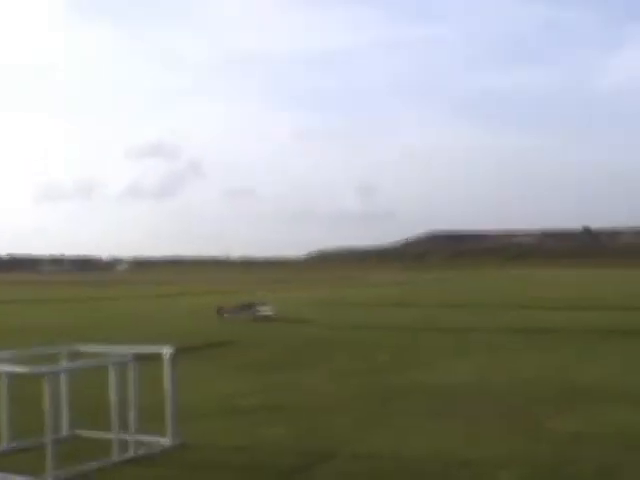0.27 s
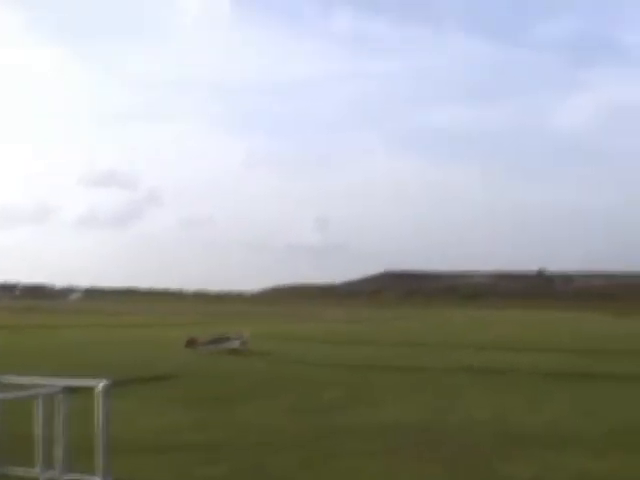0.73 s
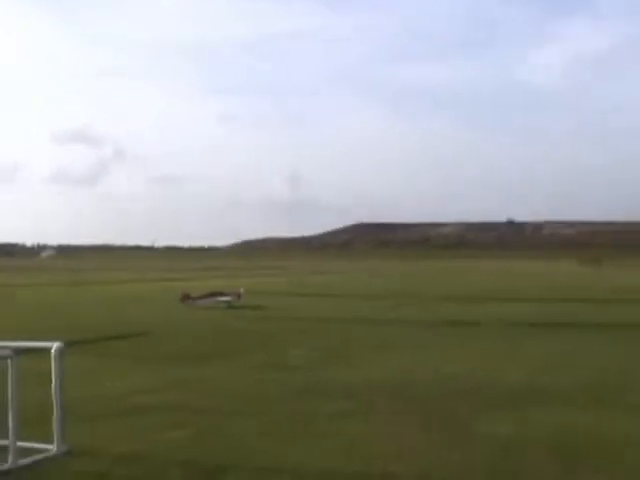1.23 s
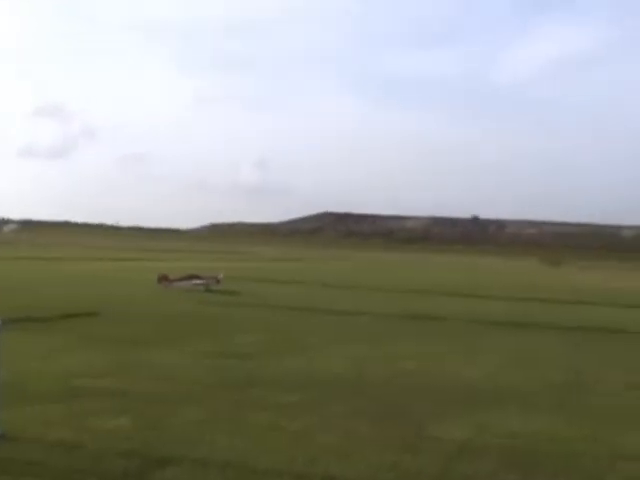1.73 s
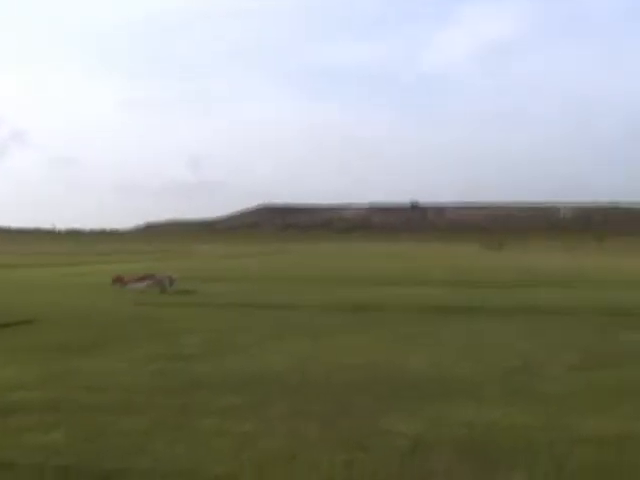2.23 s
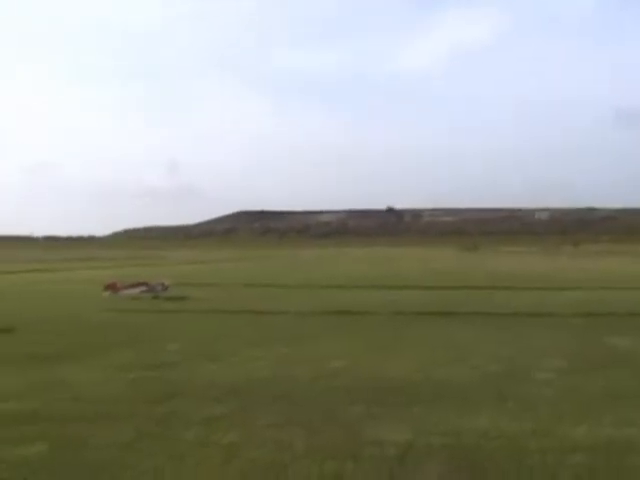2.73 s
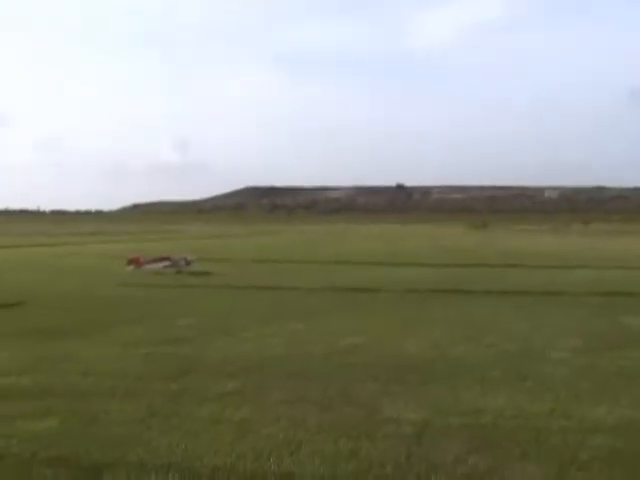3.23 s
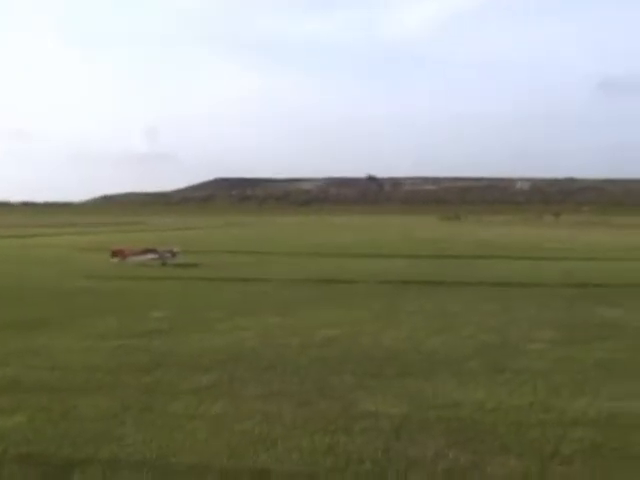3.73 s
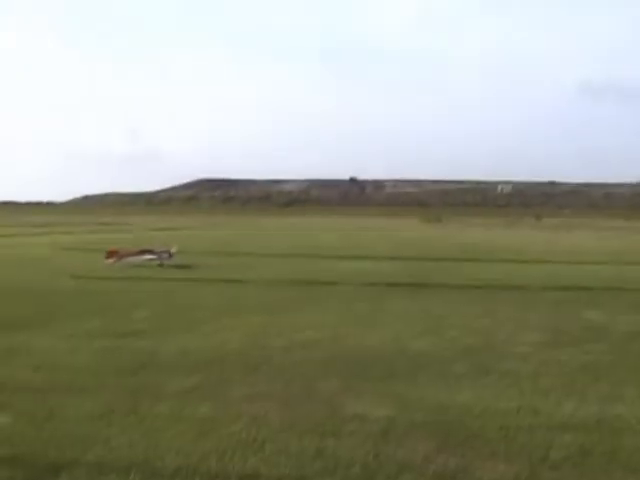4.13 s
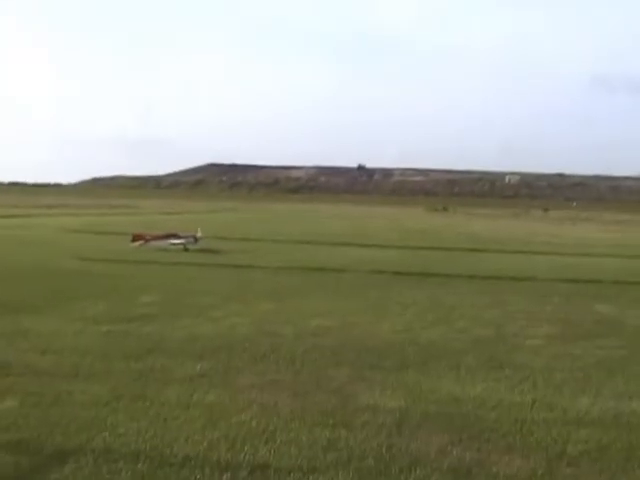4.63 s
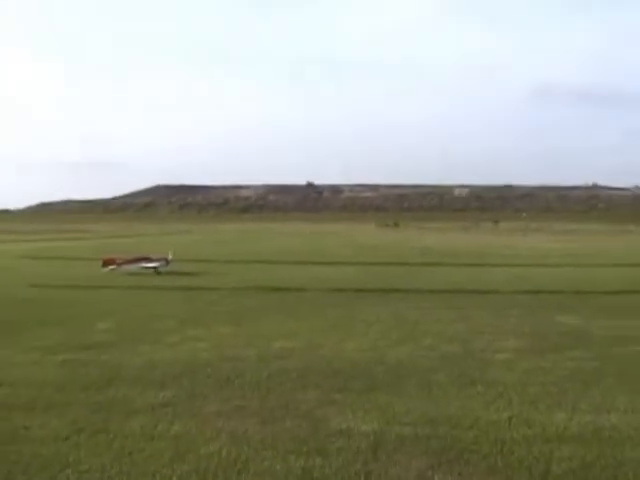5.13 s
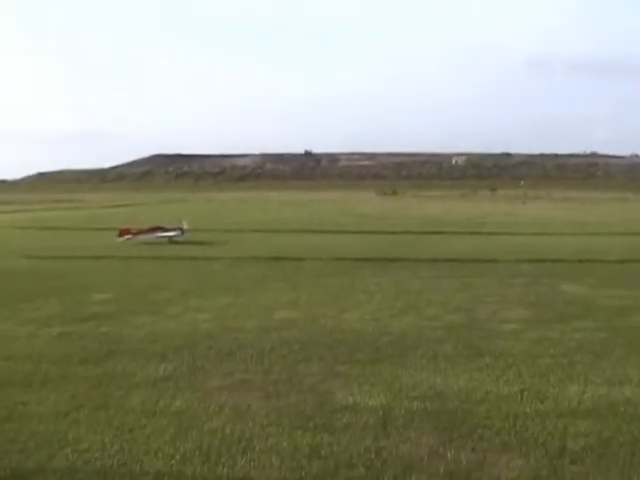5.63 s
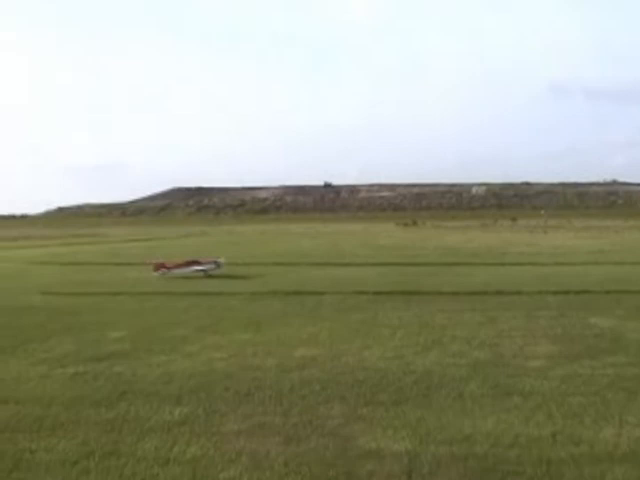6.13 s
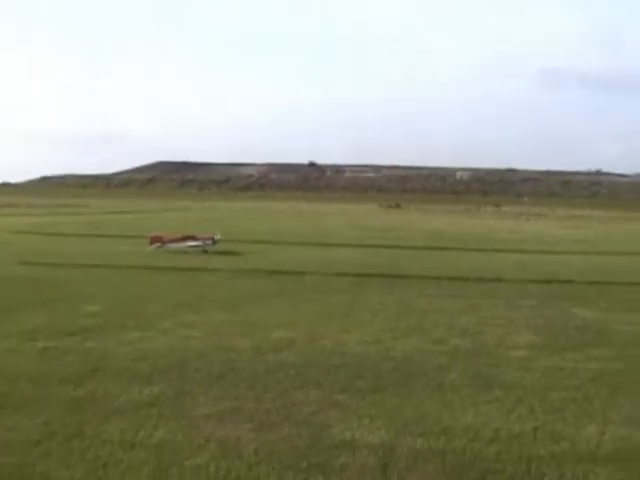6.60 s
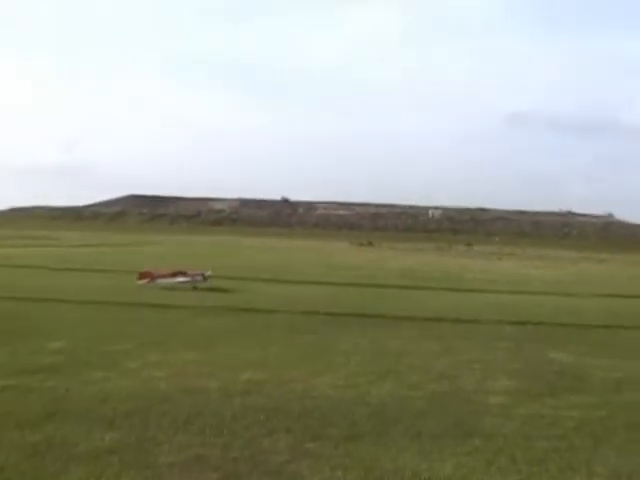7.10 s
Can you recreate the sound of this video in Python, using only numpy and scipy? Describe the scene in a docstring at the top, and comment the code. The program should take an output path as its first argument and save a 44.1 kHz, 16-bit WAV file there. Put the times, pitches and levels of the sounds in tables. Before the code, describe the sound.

A model plane's small two-stroke engine putters unevenly at idle on a grass field, faint then crackling harder, under blustery wind rumbling on the microphone.

```python
"""On a grass field a model plane's two-stroke petrol engine idles, heard through a camera's two ports.
It starts faint in a blustery wind, firing every second or third turn; from about 1 s the cracks grow hard,
peak near 4 s, soften towards 5.5 s, then harden again and fire every second turn at the end.
Each firing is a noise burst with ringing knocks and a falling thump; swelling tones make the unfired puffs,
a sine the propeller hum and coloured noise hiss, clatter and wind. The motor-whine comb hollows it all."""
import sys
import numpy as np
from scipy import signal
from scipy.fft import rfft, irfft
from scipy.io import wavfile
from scipy.ndimage import uniform_filter1d

SR = 44100
rng = np.random.default_rng(int(sys.argv[2]) if len(sys.argv) > 2 else 0)


def generate_wav(sig):
    """Save sig (samples, or channels by samples) to the path in sys.argv[1] as 16-bit PCM at SR."""
    pcm = np.round(np.clip(np.atleast_2d(sig).T, -1, 1) * 32767).astype(np.int16)
    wavfile.write(sys.argv[1], SR, pcm)


N = 324576
TIME = np.arange(N) / SR  # seconds
BINS = np.fft.rfftfreq(N, 1 / SR)  # Hz
FIRST_FIRING_S = 0.0224

# Time tables are joined by straight lines; their levels are relative, ahead of each source's trim.
# Speed of the crank. Each row: time in seconds, speed in turns per second.
CRANK_SPEED = [(0.0, 48.23), (0.15, 45.48), (0.78, 52.77), (1.44, 48.72), (2.13, 50.01), (2.37, 54.38),
               (2.49, 47.76), (2.7, 51.76), (3.12, 48.02), (3.21, 50.61), (3.99, 50.87), (4.05, 48.87),
               (4.41, 51.19), (5.55, 47.41), (5.67, 50.78), (6.63, 52.21), (6.75, 47.09), (7.35, 61.11)]
# Spells when the engine fires every second turn, not every third. Each row: start and end in seconds.
SECOND_TURN_SPELLS = [(0, .17), (1.07, 1.6), (1.66, 1.82), (1.88, 1.96), (2.55, 2.59), (2.89, 2.93),
                      (3.05, 3.09), (3.39, 3.43), (5.22, 5.26), (5.39, 5.47), (6.89, 7.4)]
# How hard the engine burns. Each row: time in seconds, relative strength in dB.
BURN_STRENGTH = [(0, -53), (.4, -49), (.78, -42), (.95, -35), (1.45, -34.5), (1.82, -36), (2.05, -33),
                 (2.7, -37), (2.87, -40.5), (3.02, -36), (3.33, -35.5), (3.8, -28.5), (4.4, -30),
                 (4.7, -35), (5.4, -36.5), (5.7, -35.5), (6.45, -31.5), (6.75, -35), (7.12, -30.5),
                 (7.35, -32)]
# Firings that clang out of the idle, each given to the nearest firing. Each row: time in seconds,
# strength over BURN_STRENGTH in dB, ringing pitch in Hz, extra sizzle in dB.
CLANGING_FIRINGS = [(.022, 4, 6000, 11), (.629, 4, 6300, -3), (.976, 2.5, 5620, -12), (1.211, 4.5, 5470, 0),
                    (1.331, 2.5, 3780, -7), (1.372, 4.5, 5280, -15), (1.413, 4, 5150, 4),
                    (1.617, 4, 5540, -4), (1.982, 2.5, 6600, -4), (2.042, 2.5, 6890, -9),
                    (2.102, 2, 7240, 12), (2.22, 0.5, 5030, 10), (2.337, 2.5, 7350, 15),
                    (2.392, 2, 6450, 28), (2.509, 3, 7200, 12), (2.73, 2.5, 5270, -11),
                    (3.007, 3.5, 5900, 0), (3.292, -2, 3450, 23), (3.687, 0, 5540, 14),
                    (3.805, 0.5, 7200, 3), (3.863, 2.5, 6000, 0), (3.921, 0, 7200, -2),
                    (4.102, -0.5, 5210, -1), (4.283, 1.5, 6900, 1), (4.402, 3, 6920, 0),
                    (5.12, 3.5, 6890, 4), (5.347, 4, 5130, 1), (5.679, 1.5, 5200, 1),
                    (5.857, 2.5, 6070, -2), (5.974, 3, 5030, 3), (6.091, 2.5, 7000, -2),
                    (6.324, 3, 5250, 1), (6.382, 0.5, 5200, -9), (6.498, 3.5, 6010, -12),
                    (7.105, 3, 6010, 1)]
# Charges that barely catch, each the nearest firing. Each entry: time in seconds.
WEAK_CHARGES = [1.251, 3.982, 5.182, 5.243, 5.451]
# Sizzling top of the cracks. Each row: time in seconds, relative level in dB.
CRACK_SIZZLE = [(0, -7), (.7, 4), (1.4, -5), (1.9, 1), (2.35, -13), (2.65, 2), (3.3, -3), (3.9, -2),
                (4.4, -1), (4.7, -2), (5.6, -14), (6.55, 0), (7.35, -10)]
# Colour of the exhaust crack. Each row: frequency in Hz, relative spectrum level in dB.
CRACK_COLOUR = [(150, 6), (400, 13.5), (700, -1.5), (1200, -2.5), (2000, -8.5), (3000, -6), (4500, -0.5),
                (5300, 0.5), (7100, -0.5), (8000, -11), (10500, -15.5), (12500, -17), (15200, -10),
                (16200, -25)]
# Resonances of muffler and cylinder. Each row: frequency in Hz, width in Hz, nominal boost in dB.
METAL_MODES = [(1714, 110, 9), (2310, 530, 9), (3415, 44, 8.5), (3650, 48, 8), (5215, 81, 6.5),
               (7090, 500, 4), (8940, 570, 6)]
# Modes that the combustion knock rings. Each row: nominal frequency in Hz,
# level against the firing in dB, decay in seconds.
KNOCK_MODES = [(1690, -6.5, 0.0044), (2290, -11.5, 0.003), (5190, -8.5, 0.0055)]
# The engine at the two ports. Each row: frequency in Hz, left minus right in dB, likeness from -1 to 1.
ENGINE_AT_PORTS = [(500, 1, -0.23), (1250, 4, 1), (1720, 7.5, 1), (2340, 0.5, 1), (3280, -5, 0.038),
                   (4130, 1, 0.47), (5900, -0.5, 0.88), (6760, 1.5, -0.25), (9130, 11, 0.2),
                   (10600, -2, 0.73), (12700, 8, 0.5), (15100, -0.5, 1)]
# Hiss and rattle between firings. Each row: time in seconds, relative level in dB.
HISS_OVER_TIME = [(0, -58.5), (.55, -58), (1.0, -48.5), (2.4, -48), (2.8, -57), (3.4, -49), (4.2, -45),
                  (4.65, -53.5), (5.7, -49.5), (6.75, -50.5), (7.35, -46)]
# Colour of hiss and clatter. Each row: frequency in Hz, relative spectrum level in dB.
HISS_COLOUR = [(600, 2), (1500, -7.5), (2400, 0.5), (3200, -0.5), (5200, -3), (7000, -2.5), (8200, -12),
               (11000, -18.5), (16200, -51)]
# Sharp ticks close to the microphone. Each row: start in seconds, relative level in dB.
CLOSE_TICKS = [(0.776, -32), (7.2687, -20)]
# Wind buffeting the ports. Each row: time in seconds, relative level in dB.
BUFFET_OVER_TIME = [(0, -27.5), (.3, -32.5), (.38, -38.5), (1.08, -42), (1.38, -30), (1.6, -27),
                    (1.78, -37), (2.14, -35.5), (2.27, -26.5), (2.75, -28), (3.2, -33.5), (3.7, -35),
                    (4.1, -37), (4.36, -35.5), (4.5, -31), (4.9, -29), (5.1, -36), (5.35, -31),
                    (5.66, -51.5), (6.0, -29), (6.22, -39), (6.5, -27.5), (6.85, -34), (7.35, -32)]
# How sharply the wind tears at the ports. Each row: time in seconds, bright flutter's share in dB.
TEARING_OVER_TIME = [(0, -15.5), (.27, -9), (.31, -13), (2.4, -12.5), (3.2, -5), (3.5, -1), (3.9, -7.5),
                     (4.8, -13), (7.35, -11)]
# Slow, deep wind pressure. Each row: time in seconds, relative level in dB.
PRESSURE_OVER_TIME = [(0, -32), (.8, -31), (1.3, -23.5), (2.05, -26.5), (2.3, -25), (3.3, -23), (3.6, -26),
                      (4.0, -20.5), (4.2, -25), (5.0, -26), (5.68, -30.5), (5.95, -21), (6.5, -22),
                      (6.72, -25.5), (7.35, -24.5)]
# Single large eddies that strike the ports. Each row: centre in seconds,
# extra buffeting in dB, extra deep pressure in dB.
LARGE_EDDIES = [(1.181, 3.5, 7.5), (1.44, -3.5, 7), (1.69, 1, 8), (1.907, 12, 4.5), (3.76, -0.5, 7.5),
                (3.89, 1, 5), (4.43, 1, 7.5), (4.547, 6, 6), (4.67, 2.5, -4), (5.169, 9, -9),
                (5.538, 6.5, 10), (5.78, 5, 4.5), (7.11, 4, -2), (7.26, 5.5, -8)]
# Moments when the wind lets go. Each row: centre in seconds, change of buffeting in dB.
WIND_LULLS = [(2.638, -9.5), (3.36, -7), (4.734, -15.5), (5.11, -4.5), (5.84, -20), (6.22, -1)]
# Colour of the wind rumble. Each row: frequency in Hz, relative spectrum level in dB.
RUMBLE_COLOUR = [(15, -6), (35, -10.5), (70, -1.5), (130, -3), (220, -2.5), (400, -12.5), (900, -65)]
# Colour of the wind buffeting. Each row: frequency in Hz, relative spectrum level in dB.
BUFFET_COLOUR = [(30, -18), (120, -1), (230, 3), (360, 1.5), (520, -3), (700, -11), (1000, -21),
                 (1500, -29.5), (2500, -39.5), (5000, -50), (12000, -83)]
# Wind at the two ports. Each row: frequency in Hz, left-right likeness from -1 to 1.
WIND_LIKENESS = [(60, 0.14), (130, -0.24), (290, -0.59), (640, -0.83), (1400, -0.67), (4000, -0.16)]


def firings(spread_db=1.0, soft_db=0.56, ring_spread_db=3, detune=0.0485, sizzle_spread_db=4.0,
            plain_ring_db=7, clang_ring_db=13, weak_db=-4.5):
    """Fires every second or third crank turn; no two charges burn quite alike.

    Each row: time in seconds, strength in dB, crank turns so far, ringing pitch in Hz,
    ringing in dB, extra sizzle in dB.
    """
    s, turns, rows = FIRST_FIRING_S, 0, []
    clangs = np.array(CLANGING_FIRINGS)
    while s < N / SR:
        burn, ring, pitch, sizzle = np.clip(rng.standard_normal(4), -2, 2)
        strength_db = value_at(s, BURN_STRENGTH) + soft_db + spread_db * burn
        ring_hz = rng.choice(clangs[:, 2]) * (1 + detune * pitch)
        ring_db = plain_ring_db + ring_spread_db * ring
        rows.append((s, strength_db, turns, ring_hz, ring_db, sizzle_spread_db * sizzle))
        wait = 2 if any(start <= s < end for start, end in SECOND_TURN_SPELLS) else 3
        s, turns = s + wait / value_at(s, CRANK_SPEED), turns + wait
    fired = np.array(rows)
    for near in WEAK_CHARGES:
        fired[abs(fired[:, 0] - near).argmin(), 1] += weak_db
    for near, extra_db, ring_hz, sizzle_db in clangs:
        k = abs(fired[:, 0] - near).argmin()
        s, _, turns = rows[k][:3]
        fired[k] = s, value_at(s, BURN_STRENGTH) + extra_db, turns, ring_hz, clang_ring_db, sizzle_db
    return fired


def cracks(fired, level_db=5.5, rise_s=.0007, crack_s=0.0004, rush=0.67, rush_s=0.0063, rush_top_db=-4,
           tail=0.034, tail_s=0.051, alike=0.28, ring_spread=0.095, even=1.0, ring_db=-22, ring_s=0.0078):
    """Hot gas bursts from the port: sharp crack, duller muffler rush, metal ping, faint field scatter."""
    lead, out = 5 * rise_s, np.zeros((2, N))
    t = np.arange(SR // 10) / SR - lead
    after, (sizzle_db,) = np.maximum(t, 0), curves(CRACK_SIZZLE)
    onset = np.exp(np.minimum(t, 0) / rise_s)
    snap = onset * np.exp(-after / crack_s)
    flow = onset * (rush * np.exp(-after / rush_s) + tail * np.exp(-after / tail_s))
    # the same metal answers every firing, while the gas swirls anew each time
    answer = engine_noise(len(t))
    usual_db = uniform_filter1d(fired[:, 1], size=7)
    for (s, db, _, ring_hz, clang_db, extra_db), usual in zip(fired, usual_db):
        ringing = 1 + ring_spread * rng.standard_normal(len(METAL_MODES))
        gas = np.sqrt(alike) * answer + np.sqrt(1 - alike) * engine_noise(len(t))
        # a harder firing mostly gains treble: its bark stays even
        top_db = np.interp(s, TIME, sizzle_db) + extra_db
        bark_db = even * (usual - db)
        burst = through_metal(gas * snap, CRACK_COLOUR, ringing, top_db, bark_db)
        burst += through_metal(gas * flow, CRACK_COLOUR, ringing, top_db + rush_top_db, bark_db)
        ping = onset * np.exp(-after / ring_s) * np.sin(2 * np.pi * ring_hz * t)
        burst[:, :len(t)] += ping * gain_of(ring_db + clang_db)
        add(out, s - lead - rise_s / 2, gain_of(db + level_db) * burst)
    return out


def exhaust_push(strength_db, follow=0.57):
    """Softened strength of a thump or puff in dB, against the hardest burning in the table."""
    return follow * (strength_db - np.transpose(BURN_STRENGTH)[1].max())


def thumps(fired, thump_db=-12.5, thump_hz=190, snap_hz=190, sag_s=0.0026, thump_s=0.0046,
           rise_s=0.00084, lead_s=0.002314):
    """Each firing thumps out of the muffler as a decaying sine whose pitch falls."""
    t, out = np.arange(SR // 20) / SR, np.zeros(N)
    cycles = np.cumsum(thump_hz + snap_hz * np.exp(-t / sag_s)) / SR
    thump = np.sin(2 * np.pi * cycles) * np.exp(-t / thump_s) * (1 - np.exp(-t / rise_s))
    for s, db in fired[:, :2]:
        add(out, s - lead_s, gain_of(thump_db + exhaust_push(db)) * thump)
    return lean_left(out)


def unfired_puffs(fired, puff_db=-21.5, puff_hz=235, puff_s=0.0042, late_s=.0013, weaker_db=-3.5,
                  uneven_db=1.5, detune=0.065):
    """The unfired turns after a firing puff softly through the muffler, each weaker on average."""
    t, out = np.arange(SR // 20) / SR, np.zeros(N)
    swell = t / puff_s * np.exp(1 - t / puff_s)
    waits = np.diff(fired[:, 2], append=fired[-1, 2] + 2)
    for (s, db, *_), wait in zip(fired, waits):
        turn_s = 1 / value_at(s, CRANK_SPEED)
        for k in range(round(wait) - 1):
            strength, pitch = rng.standard_normal(2)
            puff = -swell * np.sin(2 * np.pi * puff_hz * (1 + detune * pitch) * t)
            level_db = puff_db + exhaust_push(db) + k * weaker_db + uneven_db * strength
            add(out, s + (k + 1) * turn_s + late_s, gain_of(level_db) * puff)
    return lean_left(out)


def knocks(fired, lead_s=0.002001, rise_s=0.00014, spread_db=3, detune=0.026, hurried_db=-5):
    """Combustion knocks on cylinder and muffler just before the port opens ring the same few modes."""
    t, out = np.arange(SR // 20) / SR, np.zeros((2, N))
    hz, mode_db, decay_s = np.transpose(KNOCK_MODES)[:, :, None]
    port_hz, side_db, _ = np.transpose(ENGINE_AT_PORTS)
    sides = gain_of(np.interp(hz[:, 0], port_hz, side_db) * np.array([[.5], [-.5]]))
    # a charge that had only two turns to gather knocks more softly; so does the first
    hurried = np.diff(fired[:, 2], prepend=0) <= 2
    knock_db = uniform_filter1d(fired[:, 1], size=5) + hurried_db * hurried
    for s, db in zip(fired[:, 0], knock_db):
        strength, pitch = rng.standard_normal((2, len(KNOCK_MODES), 1))
        tones = np.sin(2 * np.pi * hz * (1 + detune * pitch) * t)
        modes = gain_of(db + mode_db + spread_db * strength) * np.exp(-t / decay_s) * tones
        add(out, s - lead_s, sides @ modes * (1 - np.exp(-t / rise_s)))
    return out


def propeller_hum(fired, prop_db=-44):
    """Two blades pass on each crank turn and hum as a sine at twice the crank speed."""
    return lean_left(gain_of(prop_db) * evened(np.sin(4 * np.pi * crank_turns(fired))))


def rattle(fired, level_db=-2.5, beat_db=1.5, grain_db=0.0, clatter_db=-4, clatter_per_s=110,
           clatter_s=0.0038, clatter_spread_db=6):
    """Intake hiss swells once a turn; piston and linkage clatter in ragged little ticks."""
    (hiss_db,) = curves(HISS_OVER_TIME)
    beat = gain_of(beat_db * np.cos(2 * np.pi * crank_turns(fired)) + grain_db * wander(190))
    hiss = evened(through_metal(engine_noise(N) * beat, HISS_COLOUR))
    hits = rng.random(N) < clatter_per_s / SR
    force = hits * gain_of(clatter_spread_db * np.minimum(rng.exponential(1, N), 2))
    dying = signal.lfilter([1], [1, -np.exp(-1 / (clatter_s * SR))], force)
    clatter = evened(through_metal(engine_noise(N) * dying * beat, HISS_COLOUR))
    return gain_of(hiss_db) * (gain_of(level_db) * hiss + gain_of(clatter_db) * clatter)


def ticks(decay_s=0.0055):
    """Short dry snaps close to the microphone: decaying noise with a wide spectrum."""
    t, force = np.arange(SR // 50) / SR, np.zeros(N)
    for s, db in CLOSE_TICKS:
        add(force, s, gain_of(db) * np.exp(-t / decay_s))
    # Each row: frequency in Hz, relative spectrum level in dB.
    snap = [(300, 10.0), (2500, 9.5), (7000, 0), (15000, -8)]
    return colour(rng.standard_normal((2, N)) * force, lambda hz: read(snap, hz))


def wind(rumble_db=1, buffet_db=9.5, gustiness_db=1.1, gust_hz=10, eddy_s=0.036, lull_s=0.019, lump_db=2.4,
         flutter_db=1.5, tear_swing_db=3.0, tear_growth=0.044, left_rumble_db=-6, left_buffet_db=-10):
    """Eddies press on the ports, the right one most; the strongest tear into a brighter flutter."""
    (low_db,), (gust_db,) = curves(PRESSURE_OVER_TIME), curves(BUFFET_OVER_TIME)
    (tear_db,) = curves(TEARING_OVER_TIME)
    for s, push_db, deep_db in LARGE_EDDIES:
        passing = np.exp(-((TIME - s) / eddy_s) ** 2)
        gust_db, low_db = gust_db + push_db * passing, low_db + deep_db * passing
    for s, drop_db in WIND_LULLS:
        lull_db = drop_db * np.exp(-((TIME - s) / lull_s) ** 2)
        gust_db, low_db = gust_db + lull_db, low_db + .5 * lull_db
    gust_db = gust_db + gustiness_db * wander(gust_hz)
    same, eddies = read(WIND_LIKENESS, BINS), wander(46)
    left = np.array([[1], [0]])
    rumble = evened(irfft(pair(same) * gain_of(read(RUMBLE_COLOUR, BINS)), N))
    air = pair(same) * gain_of(read(BUFFET_COLOUR, BINS))
    bright = 1 / (1 + (650 / (BINS + 1)) ** 4)  # crossover at 650 Hz
    body = evened(irfft(air * (1 - bright), N))
    tear = evened(irfft(air * bright, N))
    tearing = gain_of(tear_db + tear_growth * (gust_db - gust_db.mean()))
    tearing = tearing * evened(gain_of(tear_swing_db * eddies))
    buffet = body * evened(gain_of(flutter_db * eddies)) + tear * tearing
    rumble_level_db = low_db + rumble_db + lump_db * wander(27) + left_rumble_db * left
    return rumble * gain_of(rumble_level_db) + buffet * gain_of(gust_db + buffet_db + left_buffet_db * left)


def engine_noise(size):
    """Noise as the engine's sound reaches the two ports, with their level difference and likeness."""
    hz = np.fft.rfftfreq(size, 1 / SR)
    f, side_db, same = np.transpose(ENGINE_AT_PORTS)
    sides = gain_of(np.interp(hz, f, side_db) * [[.5], [-.5]])
    return irfft(pair(np.interp(hz, f, same), size) * sides, size)


def through_metal(x, spectrum, ringing=1, sizzle_db=0, bark_db=0):
    """Gives a sound the engine's ringing, a barking middle and a sizzling top."""
    hz, width, boost_db = np.transpose(METAL_MODES)

    def body(f):
        modes = (ringing * boost_db / (1 + (2 * (f[:, None] - hz) / width) ** 2)).sum(1)
        bark = bark_db / (1 + (f / 3500) ** 4)
        sizzle = sizzle_db / (1 + (10000 / (f + 1)) ** 6)
        return read(spectrum, f) + modes + bark + sizzle
    return colour(x, body)


def crank_turns(fired):
    """Turns of the crank, sample by sample, in step with the firings."""
    s, _, turns, *_ = fired.T
    outside_s = TIME - np.clip(TIME, s[0], s[-1])  # before the first or after the last firing
    return np.interp(TIME, s, turns) + outside_s * curves(CRANK_SPEED)[0]


def lean_left(x, side_db=3.5):
    """Puts one sound on both ports, the left stronger by side_db."""
    return x * gain_of(side_db * np.array([[.5], [-.5]]))


def colour(x, db_at, size=2048):
    """Causal filter of unit energy whose spectrum follows db_at(Hz)."""
    log_gain = np.log(gain_of(db_at(abs(np.fft.fftfreq(size, 1 / SR)))))
    # the Hilbert transform of the log gain supplies the minimum phase
    taps = np.fft.ifft(np.exp(np.conj(signal.hilbert(log_gain)))).real[:size // 2]
    return signal.oaconvolve(x, taps[None] / np.linalg.norm(taps), axes=1)[:, :N]


def pair(same, size=N):
    """Spectra of two noises with the given likeness, held within 0.99."""
    a, b = rfft(rng.standard_normal((2, size)))
    same = np.clip(same, -.99, .99)
    return np.array([a, same * a + np.sqrt(1 - same ** 2) * b])


def wander(hz, size=N):
    """Smooth chance of rms 1, up to about hz."""
    smooth = 1 / (1 + (np.fft.rfftfreq(size, 1 / SR) / hz) ** 4)
    return evened(irfft(rfft(rng.standard_normal(size)) * smooth, size))


def gain_of(db):
    """Decibels to gain."""
    return 10 ** (np.asarray(db) / 20)


def evened(x):
    """Scales to rms 1."""
    return x / np.sqrt(np.mean(x ** 2) + 1e-20)


def read(points, hz):
    """Reads a spectrum table on a log-frequency axis."""
    f, value = np.transpose(points)
    return np.interp(np.log(hz + 1), np.log(f), value)


def value_at(s, rows):
    """Reads a two-column time table at time s."""
    return np.interp(s, *np.transpose(rows))


def curves(rows):
    """The columns of a time table, sample by sample."""
    s, *columns = np.transpose(rows)
    return [np.interp(TIME, s, c) for c in columns]


def add(mix, s, sound):
    """Mixes a sound in at time s."""
    part = mix[..., max(round(s * SR), 0):][..., :sound.shape[-1]]
    part += sound[..., :part.shape[-1]]


def scene():
    """The engine, the close ticks and the wind at the two ports."""
    fired = firings()
    engine = cracks(fired) + thumps(fired) + unfired_puffs(fired) + knocks(fired)
    engine = engine + propeller_hum(fired) + rattle(fired)
    return engine + ticks() + wind()


def record(dry, feedback=0.6, notch_hz=149.85, edge_hz=16500):
    """Soft start; a comb notches every multiple of the camera motor's speed; then a treble limit."""
    delay = np.exp(-2j * np.pi * BINS / notch_hz)
    comb = irfft(1 - (1 - feedback) * delay / (1 - feedback * delay), N)[:SR // 8]
    started = dry * np.minimum(TIME / 0.003, 1)
    hollow = signal.oaconvolve(started, comb[None], axes=1)[:, :N]
    limit = signal.firwin(301, edge_hz, window=("kaiser", 9), fs=SR)
    return signal.oaconvolve(hollow, limit[None], "same")


dry = scene()
out = record(dry)
generate_wav(out)
```